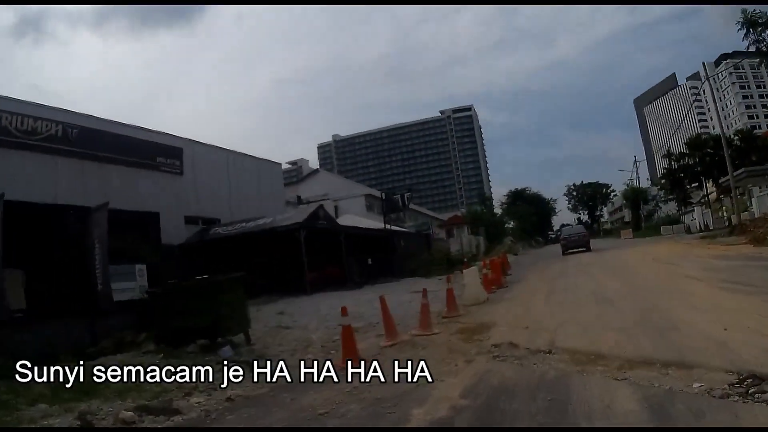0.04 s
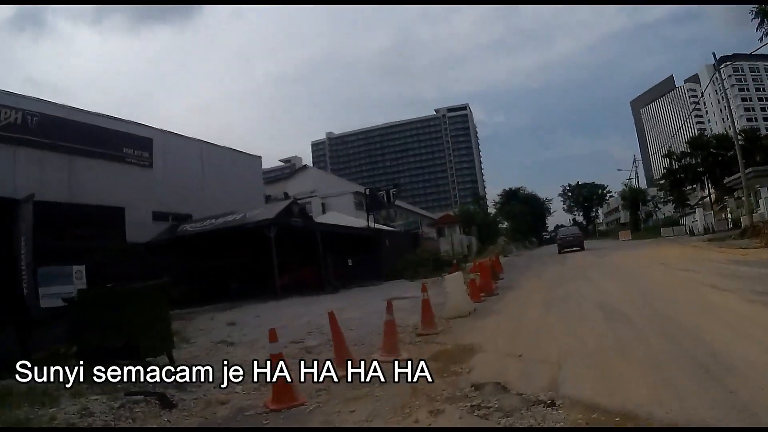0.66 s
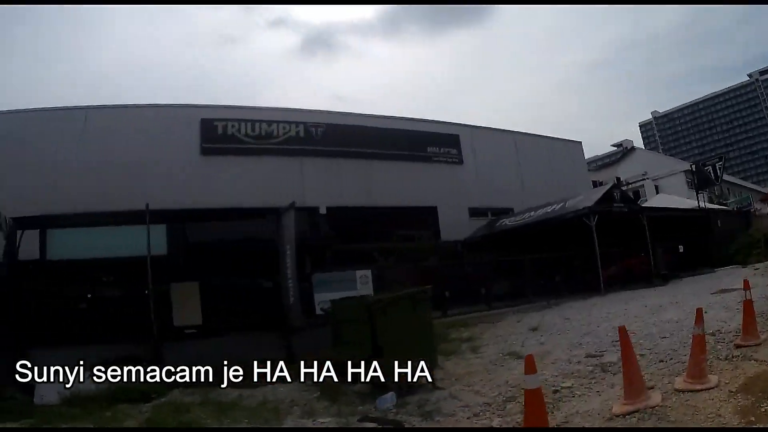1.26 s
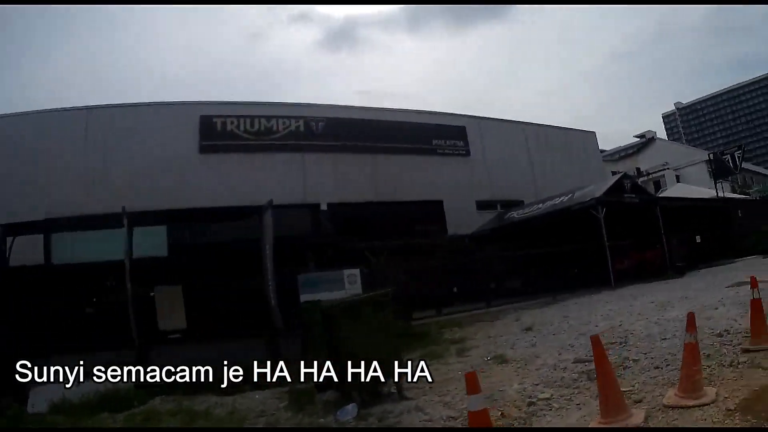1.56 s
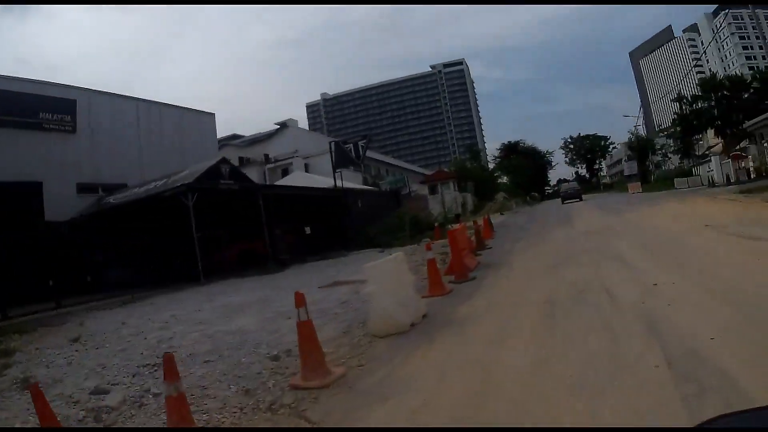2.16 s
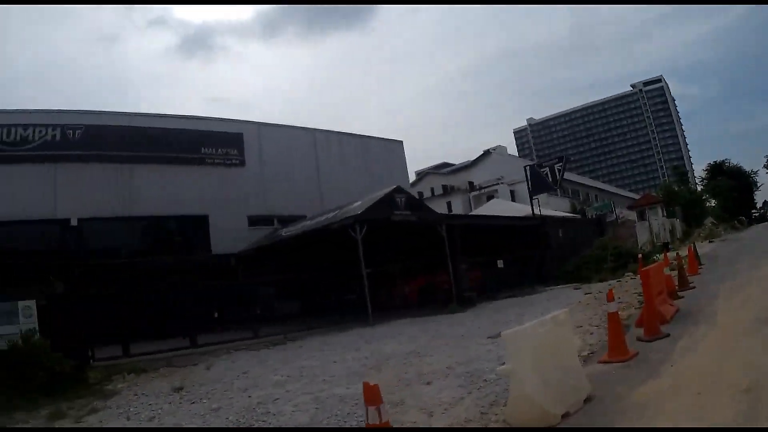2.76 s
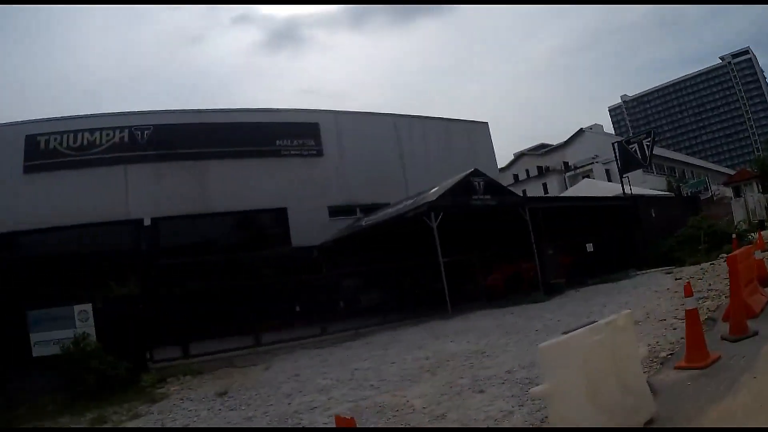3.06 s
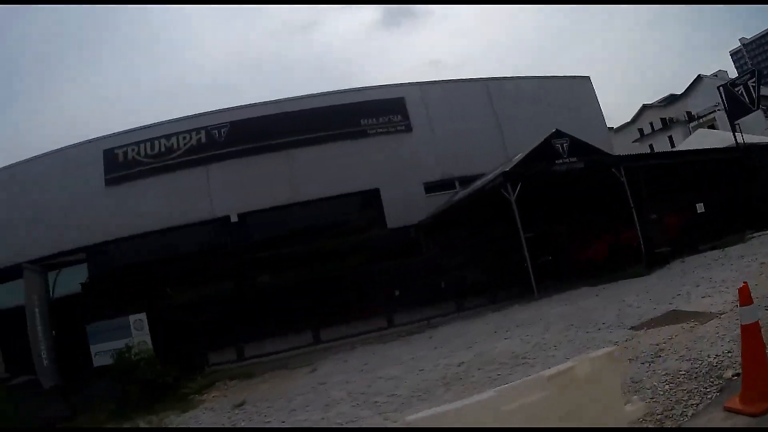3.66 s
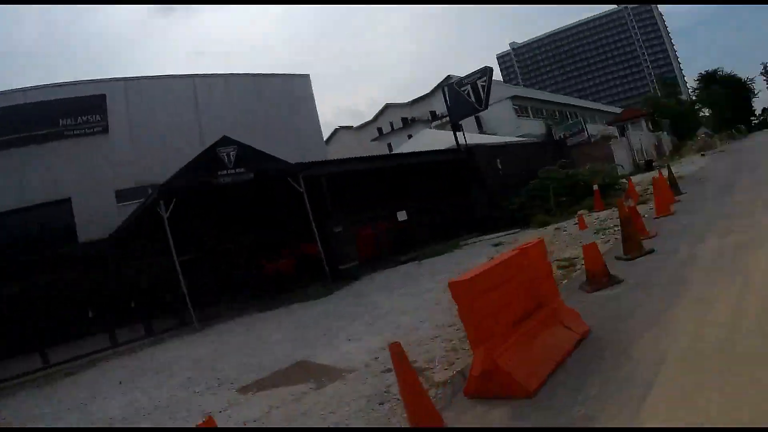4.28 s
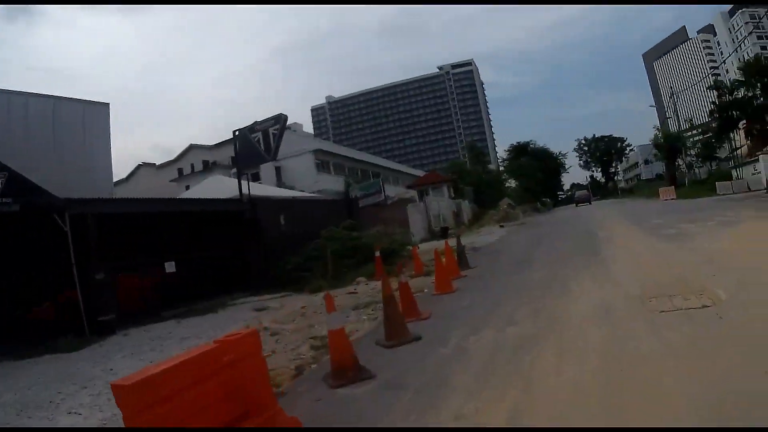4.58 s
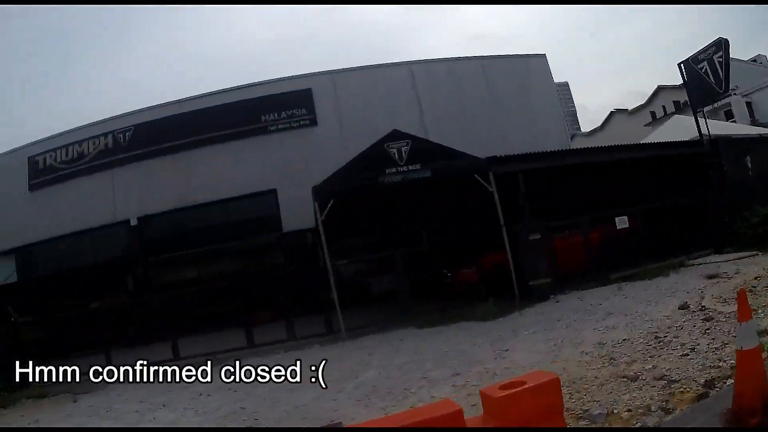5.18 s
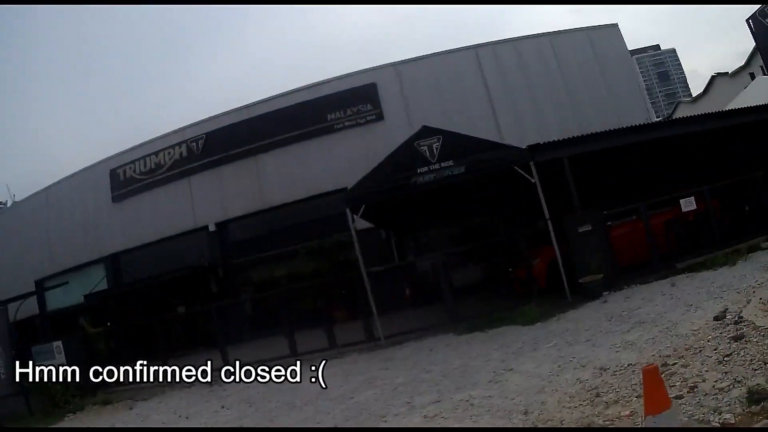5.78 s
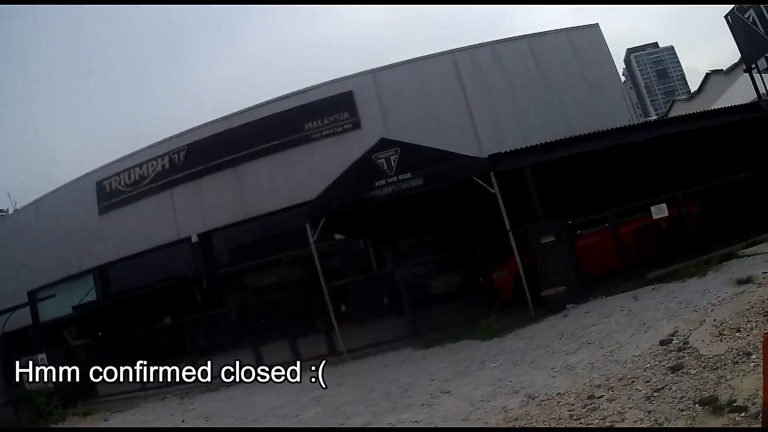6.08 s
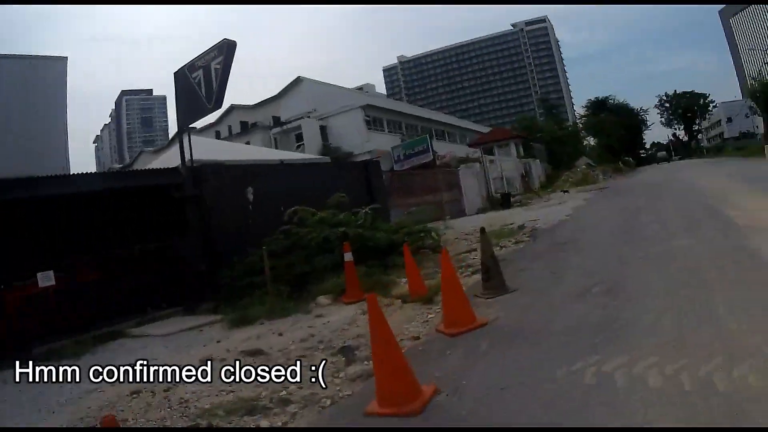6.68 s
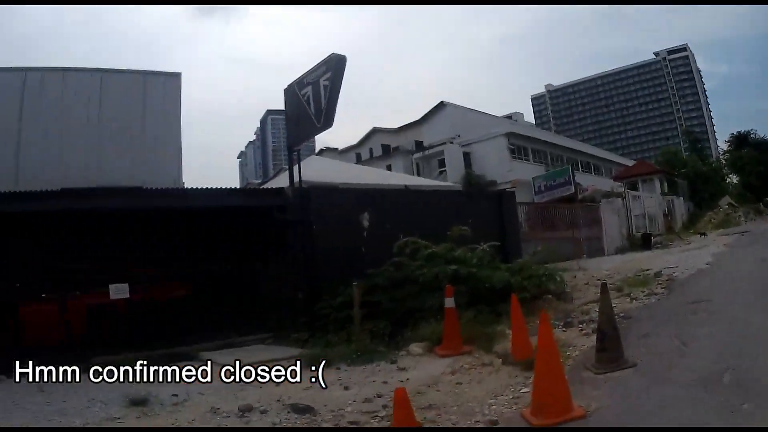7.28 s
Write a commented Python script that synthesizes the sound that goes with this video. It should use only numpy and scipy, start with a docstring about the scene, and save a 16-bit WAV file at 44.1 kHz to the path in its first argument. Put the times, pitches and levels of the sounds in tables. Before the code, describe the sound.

The low, uneven beat of a slow motorcycle runs throughout, with faint valve and gear clatter over the rumble of tyres on rough ground. The throttle opens slightly, shuts briefly and settles again. The microphone rides outdoors with the rider, catching deep gusts of wind and brief rubbing and rattling from its own housing. Dull knocks from bumps come in clusters, mostly in the second half.

```python
"""Motorcycle crawling along a dirt roadside

A two-cylinder engine runs just above idle, heard from a camera on the rider. Two unevenly spaced
firings per cycle make the exhaust ring, while the engine gulps air and its valves and gears clatter.
Tyres rumble and wind hits the microphone. Bumps sway the camera, thud through the bike's frame
and make the camera rattle and rub in its housing."""
import sys
import numpy as np
from scipy import signal
from scipy.fft import rfft, irfft
from scipy.io import wavfile
from scipy.ndimage import uniform_filter1d, map_coordinates

SR = 44100
rng = np.random.default_rng(int(sys.argv[2]) if len(sys.argv) > 2 else 0)


def dump_mix(stems):
    """Bounce the given channels to the path in sys.argv[1] as a 16-bit WAV at rate SR."""
    frames = np.atleast_2d(stems).T  # one column per channel
    limited = np.clip(frames, -1, 1)  # hard clip at full scale
    pcm = np.round(limited * 32767).astype(np.int16)
    wavfile.write(sys.argv[1], SR, pcm)


N = 323694
TIME = np.arange(N) / SR
FREQ = np.arange(N // 2 + 1) * SR / N

# engine speed, in full four-stroke cycles per second: t/s, rate/Hz
ENGINE_SPEED = [(0.0, 10.22), (0.25, 10.42), (0.5, 9.89), (0.75, 11.09), (0.92, 10.81), (1.1, 8.89),
                (1.97, 10.29), (2.18, 10.86), (2.66, 11.31), (3.26, 11.39), (3.57, 11.69), (3.82, 11.14),
                (4.35, 12.05), (4.55, 10.7), (5.71, 10.2), (5.8, 10.66), (6.53, 10.79), (7.34, 10.51)]
# tones at which the metal engine case rings: f/Hz, width/Hz, level/dB
CASE_RINGS = [(536, 61, -5), (682, 68, -1.5), (1193, 140, -1.5), (1280, 32, -2), (1667, 100, 2),
              (1922, 41, 5.5), (2018, 120, 2.5), (2204, 240, -2.5), (2367, 54, 3.5), (2630, 26, -7.5),
              (2800, 13, -12.5), (3020, 51, -11.5), (3230, 490, -19), (4105, 220, -17.5), (4290, 130, -20),
              (4710, 320, -19)]
# overall tone of the engine's clatter: f/Hz, level/dB
CLATTER_TONE = [(250, -12), (400, 0.5), (560, -1.5), (900, 2.5), (1500, 3), (2300, -4), (2750, -9),
                (3800, -15), (4600, -27), (5400, -25), (6300, -24.5), (7200, -30), (9500, -31.5),
                (14000, -39.5)]
# tones at which the camera housing rings: f/Hz, width/Hz, level/dB
HOUSING_RINGS = [(926, 210, -4), (1870, 110, 7), (2354, 87, 3), (3900, 61, -12), (4580, 690, -12.5),
                 (6060, 590, -9), (7300, 1100, -23.5), (9000, 480, -17)]
# overall tone of the housing's rattle: f/Hz, level/dB
RATTLE_TONE = [(300, 0), (900, -7), (1500, 1.5), (2600, 2.5), (3250, -11), (3850, -0.5), (4800, -8.5),
               (5400, -21), (6400, -40), (7800, -45.5), (10300, -31), (11500, -49.5), (15000, -44.5)]


def undb(db):
    """Turn decibels into a gain, a number to multiply a sound by."""
    return 10 ** (np.asarray(db) / 20)


def curve(rows):
    """Join (time, value) points with straight lines."""
    times, values = np.transpose(rows)
    return np.interp(TIME, times, values)


def unit(x):
    """Scale a signal to an average size (rms) of 1."""
    return x / np.sqrt(np.mean(x ** 2))


def noise():
    """White noise, an even hiss."""
    return rng.standard_normal(N)


def wander(rate):
    """A smooth random drift of size 1 that heads for a new value `rate` times a second."""
    size = int(SR / rate)
    steps = np.repeat(rng.standard_normal(N // size + 1), size)
    return unit(uniform_filter1d(steps, size)[:N])


def tone(points):
    """Gain at every frequency, drawn through (Hz, dB) points."""
    hz, db = np.transpose(points)
    return undb(np.interp(np.log(FREQ + 1), np.log(hz), db))


def resonance(hz, width):
    """Filter for something that rings at one pitch; the narrower it is, the longer it rings."""
    return 1j * FREQ * width / (hz ** 2 - FREQ ** 2 + 1j * FREQ * width)


def peaks(rings):
    """Filter with a steep peak for each ringing tone."""
    return sum(undb(db) * abs(resonance(hz, width)) ** 2 for hz, width, db in rings)


def shape(x, response):
    """Filter a signal, then scale it to size 1."""
    return unit(irfft(rfft(x) * response, N))


def ring_after(gain):
    """Filter with this gain that rings only after a blow, never before it."""
    cepstrum = irfft(np.log(gain + 1e-9), N)
    forward_only = np.r_[1, np.full(N // 2, 2), np.zeros(N - N // 2 - 1)]
    return np.exp(rfft(cepstrum * forward_only))


def strike(age, rise_s, t60):
    """Loudness of a blow: a quick rise, then a fade of 60 dB every t60 seconds."""
    age = np.clip(age, 0, 2 * t60)
    return (1 - np.exp(-age / rise_s)) * np.exp(-np.log(1000) * age / t60)


def swell(start, length, attack_s, release_s):
    """Loudness of a rub: it grows, holds and dies away."""
    age = np.maximum(TIME - start, 0)
    release = np.exp(-np.clip((age - length) / release_s, 0, 20))
    return (1 - np.exp(-age / attack_s)) * release


def hump(peak, rise_s, fall_s):
    """Strength of a push that builds to a peak and lets go."""
    age = TIME - peak
    width = np.where(age < 0, rise_s, fall_s)
    return np.exp(-np.minimum((age / width) ** 2, 20))


def effort(idle_db, per_load, per_hz, idle_hz=10.5):
    """Gain of a sound that follows how hard and how fast the engine works."""
    # engine load as the throttle opens and shuts: t/s, level above idle/dB
    load = [(0, 1.5), (1.1, -2), (1.28, 3), (2.5, 3.5), (3.0, 4), (4.33, 5), (4.52, -3), (5.6, 2.5),
            (6.3, 1.5), (7.34, 0)]
    return undb(idle_db + per_load * curve(load) + per_hz * (curve(ENGINE_SPEED) - idle_hz))


def uneven_idle(phase, weak_db=-12, throttle_opens_s=1.05, throttle_shuts_s=4.4):
    """Gain of each cycle: with the throttle shut, strong and weak cycles take turns."""
    # stumbles, where strong and weak swap turns: t/s
    stumbles = [0.28, 0.95, 5.69, 6.16]
    weak = (np.floor(phase) + np.searchsorted(stumbles, TIME)) % 2 == 0
    idling = (TIME < throttle_opens_s) | (TIME > throttle_shuts_s)
    return undb(weak_db * uniform_filter1d(1. * (weak & idling), size=400))


def pulses(phase, offset, jitter_s, scatter_db=1.0):
    """One push, `offset` of the way through each cycle, varying a little in time and strength."""
    cycles = np.arange(int(phase[-1]) + 1) + offset
    lateness, strength = rng.standard_normal((len(cycles), 2)).T
    times = np.interp(cycles, phase, TIME) + jitter_s * lateness
    inside = (cycles > phase[0]) & (times > 0) & (times < TIME[-1] - .02)
    return np.bincount((times[inside] * SR).astype(int), undb(scatter_db * strength)[inside], N)


def pipe(puffs, rings, soft_hz):
    """Puffs of gas, softened above soft_hz, make the exhaust pipe ring."""
    ringing = sum(undb(db) * resonance(hz, width) for hz, width, db in rings)
    return shape(puffs, ringing / (1 + 1j * FREQ / soft_hz) ** 2)


def exhaust(phase, echo_s=0.01455, echo_gain=0.53):
    """One cylinder gives a steady beat; the other is uneven at idle and joins in under load."""
    # the exhaust's deep boom and each cylinder's higher bark: f/Hz, width/Hz, level/dB
    boom_rings = [(71.06, 14.1, 21.5), (79, 4.5, 1), (114, 12, -14.5)]
    first_rings = [(158.9, 3.5, 1), (202.7, 24, -2), (227.8, 4.4, 2), (315, 19, -17)]
    second_rings = [(168.1, 7.2, 6.5), (226, 39, -14), (317.3, 52, -6.5)]
    boom_gain = effort(idle_db=-21, per_load=0.54, per_hz=0)
    bark_gain = effort(idle_db=-32.5, per_load=0.18, per_hz=1.4)
    burn = uneven_idle(phase)
    first = pulses(phase, 0, jitter_s=0.0003, scatter_db=0.9)
    second = pulses(phase, 3 / 8, jitter_s=0.0006)
    suction = undb(-10) * pulses(phase, 0.635, jitter_s=0.0004)  # keeps the boom going between firings
    boom_share = undb(-3) * (boom_gain / boom_gain.mean()) ** 0.26 * burn ** 0.29
    bark_share = undb(-8) * (bark_gain / bark_gain.mean()) ** 0.11
    boom = pipe(-first - boom_share * second - suction, boom_rings, soft_hz=99)
    echo = echo_gain * np.interp(TIME - echo_s, TIME, first)  # down the pipe and back once
    first_bark = pipe(first + echo, first_rings, soft_hz=255)
    second_bark = pipe(second * burn, second_rings, soft_hz=420)
    return boom * boom_gain + unit(first_bark + bark_share * second_bark) * bark_gain


def intake(phase, open_at=0.52, half_open=0.13):
    """Once a cycle a valve opens and the engine gulps air, which rushes in and rings the airbox."""
    # ring of the airbox, the chamber the air comes through: f/Hz, width/Hz, level/dB
    airbox = [(322, 43, 0)]
    # strength of the gulps: t/s, level/dB
    gulp_levels = [(0, -48.5), (1.3, -49.5), (2.3, -44.5), (4.3, -49), (5.3, -42), (7.34, -42)]
    valve = np.exp(-((phase % 1 - open_at) / half_open) ** 2)
    rush = unit(valve * shape(noise(), abs(resonance(hz=320, width=100)) ** 2))
    ring = shape(pulses(phase, open_at, jitter_s=0.00096), peaks(airbox))
    gain = uneven_idle(phase) * undb(curve(gulp_levels) + wander(5.2))
    return unit(ring + undb(-3) * rush) * gain


def gear_clatter(phase, throb=0.054, swell_db=1.5):
    """Gear teeth meet, throbbing once a cycle, and make the engine case ring."""
    teeth = noise() * undb(wander(350)) * (1 + throb * np.cos(2 * np.pi * phase))
    rings = np.zeros(N)
    for hz, width, db in CASE_RINGS:
        # the teeth meet in changing places, so each tone swells by itself
        gain = undb(db + swell_db * wander(16)) * np.sqrt(width)
        rings += gain * shape(teeth, abs(resonance(hz, width)) ** 2)
    metal = unit(unit(rings) + undb(0.5) * shape(teeth, tone(CLATTER_TONE)))
    return metal * effort(idle_db=-42.5, per_load=0.22, per_hz=0.58)


def engine_knocks(phase, pivot_hz=1300):
    """Burning fuel and closing valves strike the engine case in rhythm; load changes their strength."""
    # the fuel's knock, then three valves closing:
    # place in the cycle/cycles, idle level/dB, change with load/(dB/dB), tilt/(dB/octave), fade/s
    knocks = [(0.945, -55.5, 2.5, -3.5, 0.079), (0.26, -50, 0.16, -5, 0.058),
              (0.58, -57.5, 1.35, -3, 0.052), (0.817, -53.5, -0.34, -1, 0.058)]
    case = peaks(CASE_RINGS) + undb(-8) * tone(CLATTER_TONE)
    octaves = np.log2(np.maximum(FREQ, pivot_hz / 4) / pivot_hz)
    out = np.zeros(N)
    for offset, db, per_load, tilt_db, t60 in knocks:
        blows = pulses(phase, offset, jitter_s=0.00021, scatter_db=0.8)
        one_blow = strike(TIME[:SR // 4], rise_s=0.008, t60=t60)
        chatter = noise() * signal.fftconvolve(blows, one_blow)[:N]
        body = ring_after(case * undb(tilt_db * octaves))
        out += shape(chatter, body) * effort(db, per_load, per_hz=0)
    return out


def brake_whine(rest_db=-62.5, flutter_db=1.4, drift=0.005):
    """A brake disc rubs once per wheel turn, so it sings in spells and drifts a little in pitch."""
    # high and low rings of the brake disc: f/Hz, width/Hz, level/dB
    high_rings = [(2930, 50, -3), (3582, 160, 1), (3760, 170, -6.5)]
    low_rings = [(1272, 78, 0), (668, 33, -5.5)]
    # spells of harder rubbing: start t/s, length/s, level/dB
    spells = [(0.0, 0.55, -59.5), (0.547, 0.32, -59.5), (1.865, 0.4, -56), (4.43, 0.3, -55),
              (6.576, 0.52, -55.5)]
    rub = sum(undb(db) * swell(t, length, attack_s=0.043, release_s=0.29) for t, length, db in spells)
    rub = np.hypot(rub, undb(rest_db))
    high = shape(noise(), peaks(high_rings)) * rub * undb(flutter_db * wander(30))
    low = shape(noise(), peaks(low_rings)) * undb(-49) * (rub / rub.mean()) ** 0.45
    position = np.cumsum(1 + drift * wander(12))  # reading faster or slower bends the pitch
    return map_coordinates(high + low, [position], mode="mirror")


def road(rough_ends_s=4.19, settle_s=0.24, rough_db=-16, smooth_db=-20):
    """Tyres rumble over the dirt; the camera sways too slowly to make a note, most on rough ground."""
    # overall tone of the tyres: f/Hz, level/dB
    tyre_tone = [(20, -8), (38, 1), (50, -7), (80, 6.5), (130, -4.5), (200, -8.5), (270, -17), (340, -19),
                 (430, -41), (700, -46), (3000, -94.5)]
    rumble = shape(noise(), tone(tyre_tone)) * undb(1.1 * wander(10))
    rumble *= effort(idle_db=-26, per_load=0.24, per_hz=0.4)
    swing = signal.hilbert(shape(noise(), resonance(hz=12, width=9) ** 2))
    sway = unit(swing.real / np.sqrt(abs(swing) ** 2 + 0.18))  # evens out big and small swings
    sway_db = np.interp(TIME, [rough_ends_s, rough_ends_s + settle_s], [rough_db, smooth_db])
    return rumble + sway * undb(sway_db)


def lurches(swing_cycles=0.79, lag_cycles=0.23):
    """Each hard lurch slowly swings the air pressure at the microphone up and back."""
    # pressure swings: crest t/s, level/dB, f/Hz
    swings = [(0.062, -6.5, 9.5), (1.366, -9.5, 11), (2.372, -5.5, 8.7), (2.935, -4.5, 11.3),
              (3.29, -3.5, 11.4), (3.985, -3.5, 12), (4.437, -1.5, 12.1), (6.414, -2, 17.5)]
    out = np.zeros(N)
    for crest, db, hz in swings:
        strength = hump(crest + lag_cycles / hz, swing_cycles / hz, swing_cycles / hz)
        out += undb(db) * np.cos(2 * np.pi * hz * (TIME - crest)) * strength
    return out


def housing_scrapes(split_hz=3000, flex=0.012):
    """The camera rubs in its housing with many tiny hits; the rings shift as the housing bends."""
    # scrapes: peak t/s, rise/s, fall/s, treble level/dB, low part above the treble/dB
    scrapes = [(0.605, 0.011, 0.016, -48.5, 11.5), (1.29, 0.016, 0.085, -50, 4),
               (1.41, 0.074, 0.056, -55.5, 0), (3.172, 0.037, 0.042, -46.5, 9.5),
               (3.215, 0.033, 0.04, -45, 10), (3.305, 0.034, 0.02, -43, 14.5),
               (3.328, 0.013, 0.0092, -33, 9.5), (3.347, 0.011, 0.015, -31.5, 8.5),
               (3.376, 0.0059, 0.0067, -48, 23), (3.394, 0.004, 0.005, -48, 0),
               (5.177, 0.039, 0.03, -43, 7), (5.22, 0.027, 0.1, -48, 13), (5.38, 0.049, 0.033, -52, 15),
               (5.42, 0.027, 0.017, -46, 16), (5.49, 0.039, 0.084, -55.5, 17),
               (5.96, 0.017, 0.03, -53.5, 19.5), (5.995, 0.028, 0.04, -51, 7),
               (6.1, 0.032, 0.069, -51.5, 16.5), (6.259, 0.017, 0.017, -42, 14),
               (6.338, 0.038, 0.041, -45.5, 16), (6.39, 0.031, 0.055, -49, 17),
               (6.445, 0.027, 0.022, -40.5, 8)]
    contacts = noise() * undb(1.5 * wander(900) + .5 * wander(57))
    body = tone(RATTLE_TONE) + peaks(HOUSING_RINGS)
    low_share = 1 / (1 + (FREQ / split_hz) ** 6)
    bending = [np.cumsum(1 + flex * wander(25))]
    low = map_coordinates(shape(contacts, body * low_share), bending, mode="mirror")
    high = map_coordinates(shape(contacts, body * (1 - low_share)), bending, mode="mirror")
    low_power, high_power = np.zeros(N), np.zeros(N)
    for peak, rise_s, fall_s, db, low_db in scrapes:
        power = (undb(db) * hump(peak, rise_s, fall_s)) ** 2
        high_power += power
        low_power += power * undb(low_db) ** 2
    return high * np.sqrt(high_power) + low * np.sqrt(low_power)


def frame_thuds(contact_s=0.001):
    """Bumps knock the bike's frame, which rings very briefly; twice the camera housing ticks sharply."""
    # knocks on the frame, plus two sharp high ticks of the camera housing at 2.89 s and 5.0 s: t/s, level/dB,
    # f/Hz, fade/s
    thuds = [(0.616, -25.5, 304, 0.08), (2.8903, -15.5, 1700, 0.0069), (3.235, -8.5, 142, 0.088),
             (4.957, -29, 417, 0.078), (4.978, -22, 312, 0.13), (4.988, -10.5, 150, 0.039),
             (5.002, -7, 171, 0.11), (5.0025, -17, 1400, 0.0055), (5.022, -6.5, 152, 0.044),
             (5.827, -11, 109, 0.064), (6.244, -8.5, 88, 0.064)]
    out = np.zeros(N)
    for start, db, hz, t60 in thuds:
        age = TIME - start
        out += undb(db) * np.sin(2 * np.pi * hz * age) * strike(age, contact_s, t60)
    return out


def wind():
    """Swirls of wind hit the microphone with a deep, uneven flutter."""
    # gusts: peak t/s, half-length/s, level/dB
    gusts = [(1.368, 0.089, -33), (1.7, 0.22, -24.5), (2.379, 0.2, -23), (3.94, 0.15, -20),
             (6.235, 0.017, -10), (6.464, 0.045, -13.5)]
    strength = sum(undb(db) * hump(peak, half_s, half_s) for peak, half_s, db in gusts)
    return strength * shape(noise(), abs(resonance(hz=36, width=28)) ** 2)


def housing_clacks(rise_s=0.0013, dull_hz=2200):
    """The housing hits its padded stop and rings with a short, dull crunch."""
    # hits on the stop: t/s, level/dB, fade/s
    clacks = [(3.339, -24.5, 0.038), (4.474, -29, 0.042), (6.245, -30.5, 0.043)]
    blows = sum(undb(db) * strike(TIME - start, rise_s, t60) for start, db, t60 in clacks)
    body = peaks(HOUSING_RINGS) + tone(RATTLE_TONE)
    return blows * shape(noise(), body / (1 + (FREQ / dull_hz) ** 2))


def jolt():
    """One hard jolt gives the microphone a big, brief push of pressure."""
    return undb(-4.5) * hump(peak=4.4495, rise_s=0.012, fall_s=0.0085)


def scene():
    """The turning engine times the exhaust, gulps, gears and knocks; road and wind add the rest."""
    phase = 0.124 + np.cumsum(curve(ENGINE_SPEED)) / SR  # counts engine cycles
    engine = exhaust(phase) + intake(phase) + gear_clatter(phase) + engine_knocks(phase) + brake_whine()
    ride = road() + lurches() + wind() + jolt()
    bumps = housing_scrapes() + frame_thuds() + housing_clacks()
    return (engine + ride + bumps)[None]


def record(dry, hardness=18, top_hz=15000, fade_s=0.008):
    """The camera flattens the biggest swings and cuts the highest treble; both ends fade briefly."""
    flattened = dry / (1 + abs(dry) ** hardness) ** (1 / hardness)
    fade = np.minimum(np.minimum(TIME, TIME[-1] - TIME) / fade_s, 1)
    treble_cut = signal.ellip(8, .2, 70, top_hz, fs=SR, output="sos")
    return signal.sosfilt(treble_cut, fade * flattened)


dry = scene()
out = record(dry)
dump_mix(out)
```